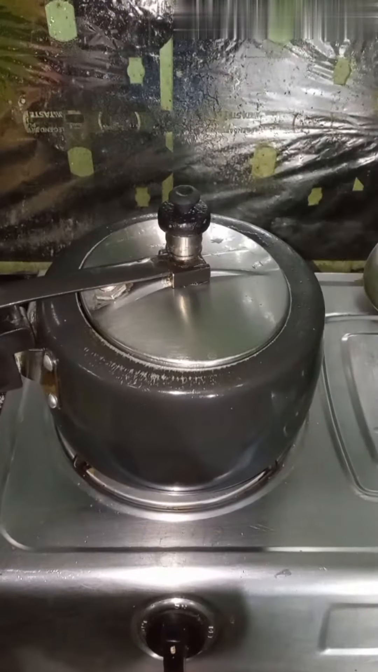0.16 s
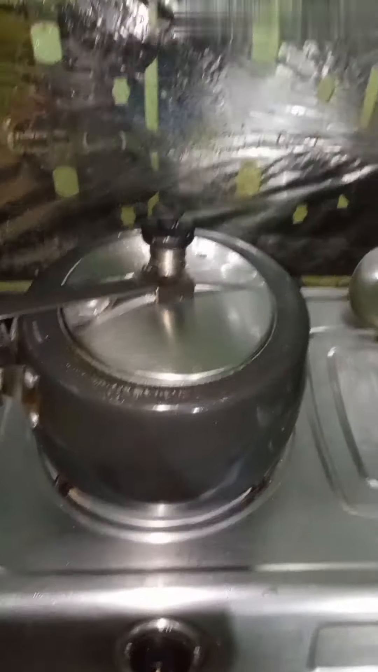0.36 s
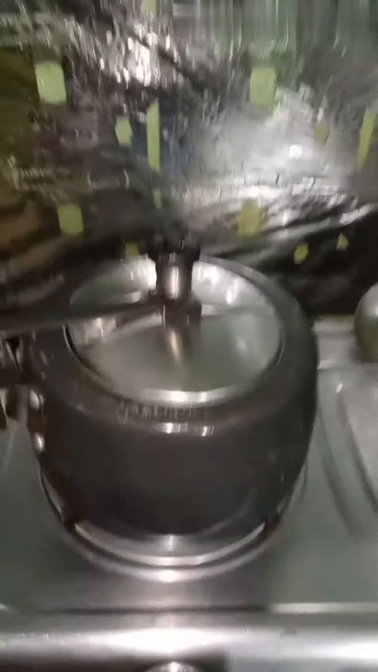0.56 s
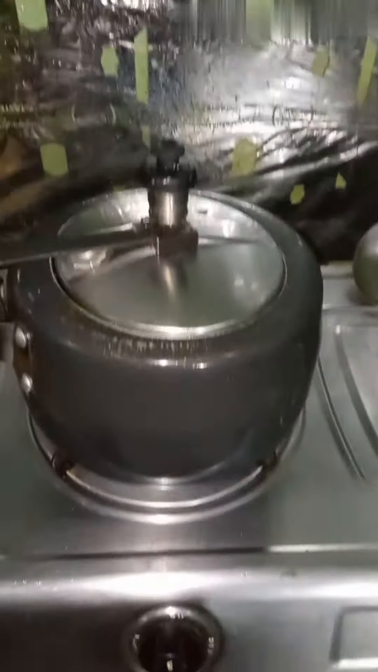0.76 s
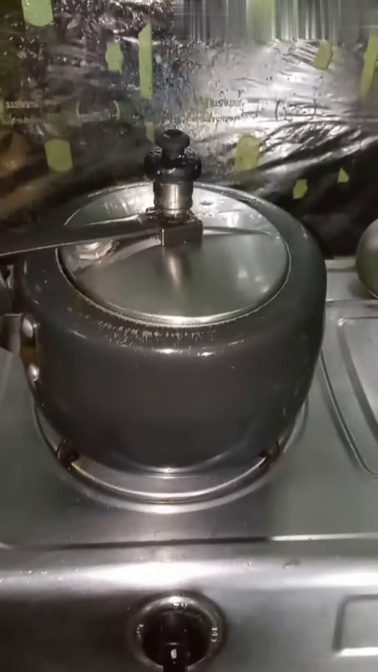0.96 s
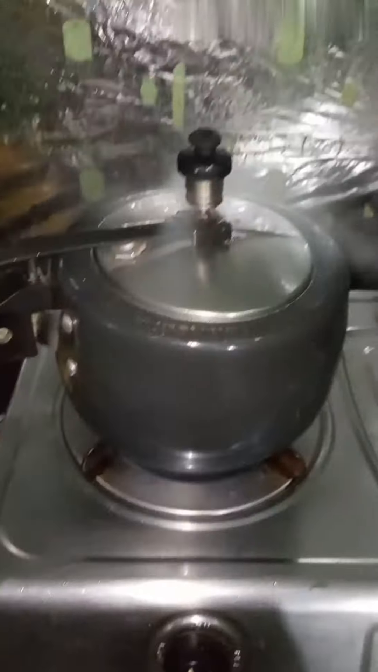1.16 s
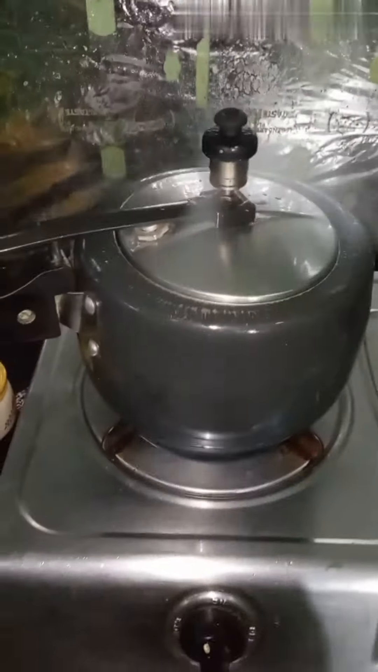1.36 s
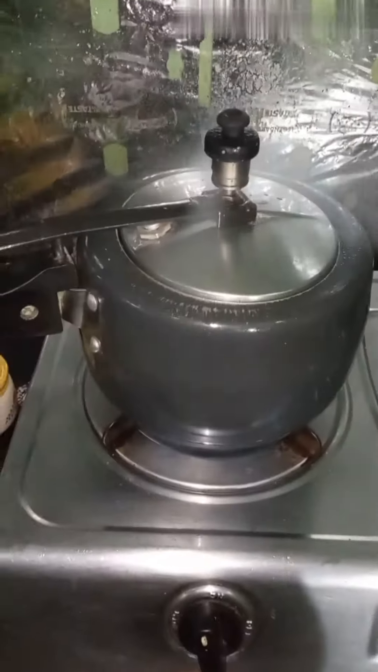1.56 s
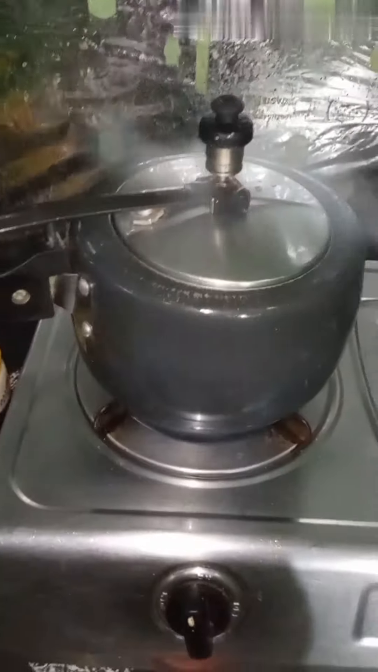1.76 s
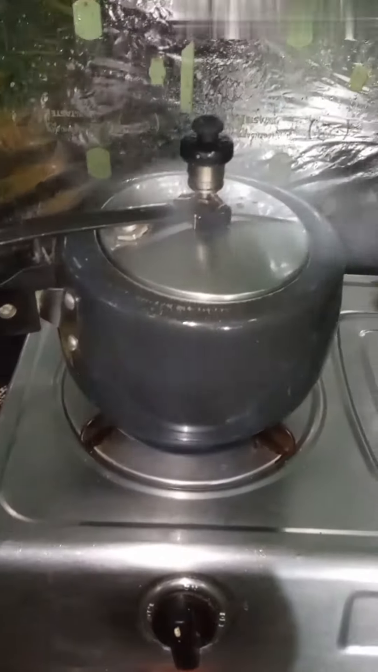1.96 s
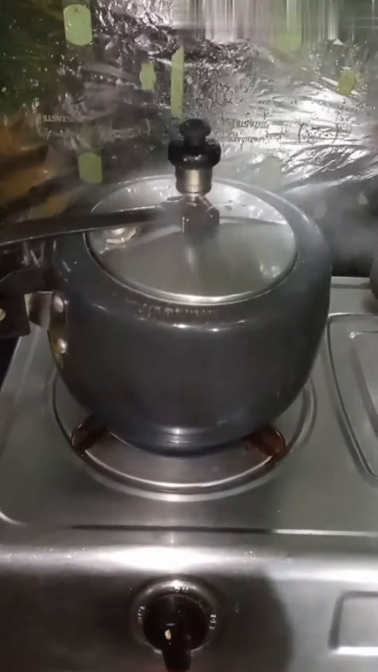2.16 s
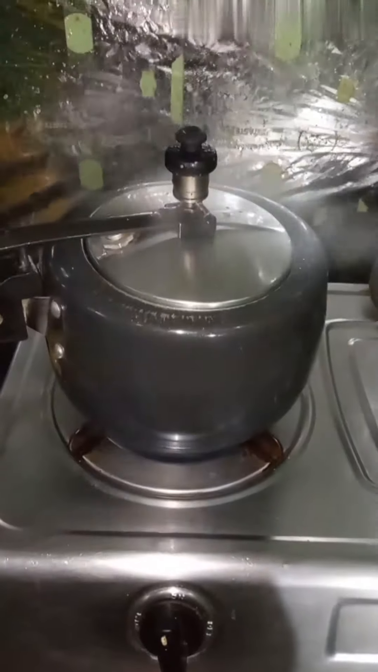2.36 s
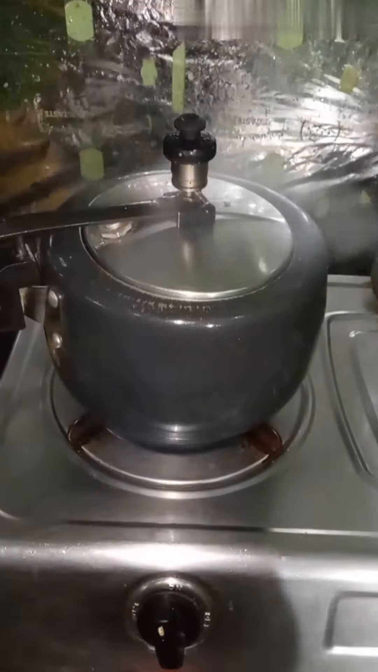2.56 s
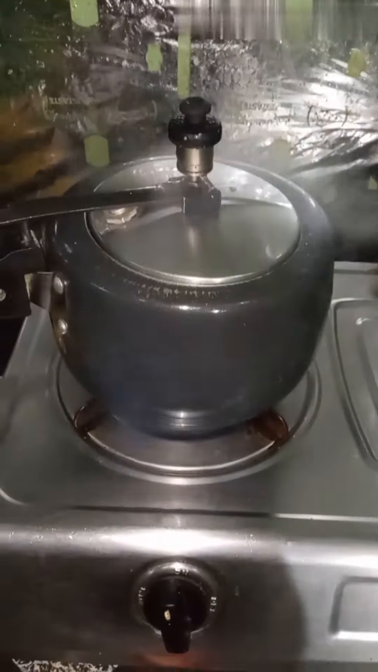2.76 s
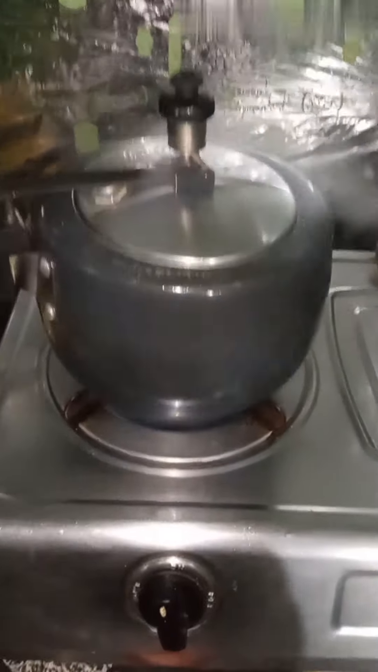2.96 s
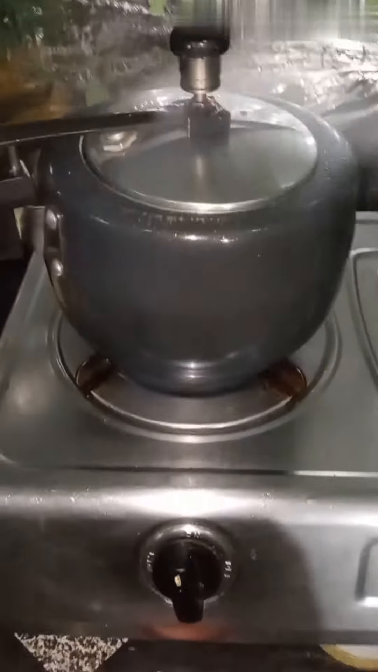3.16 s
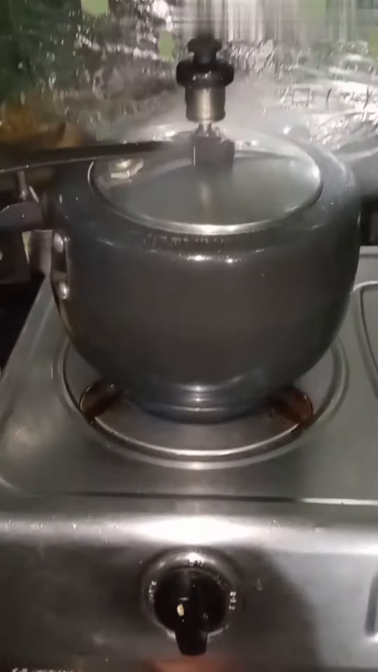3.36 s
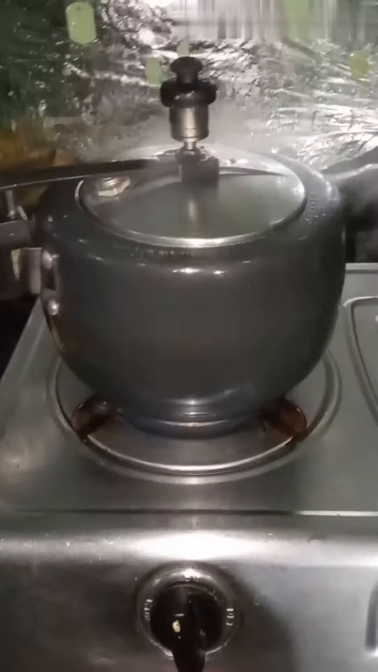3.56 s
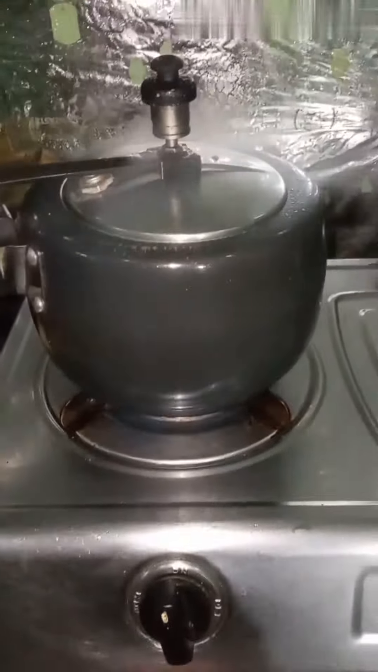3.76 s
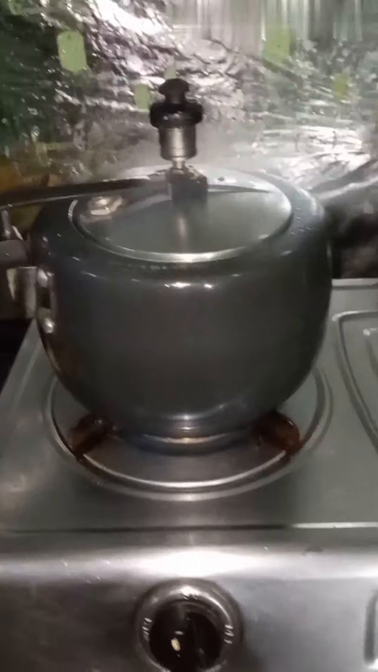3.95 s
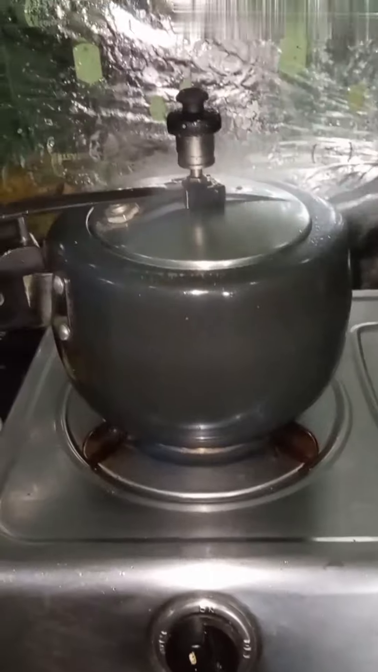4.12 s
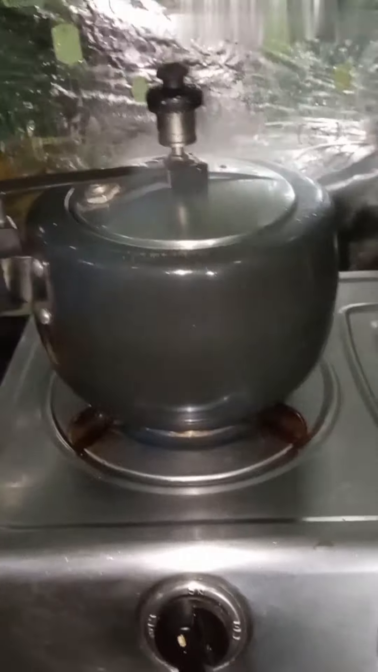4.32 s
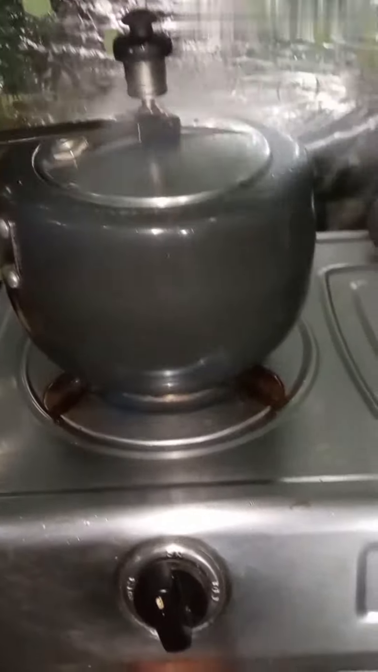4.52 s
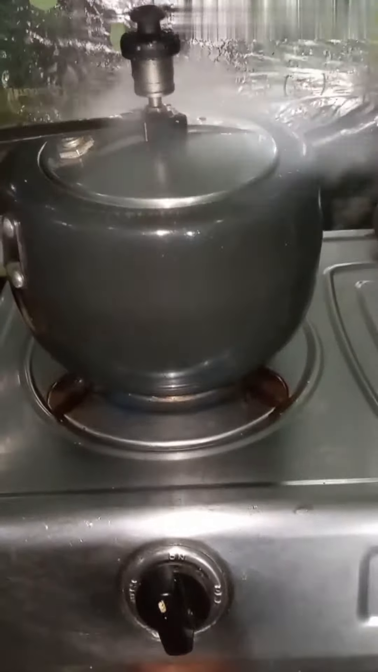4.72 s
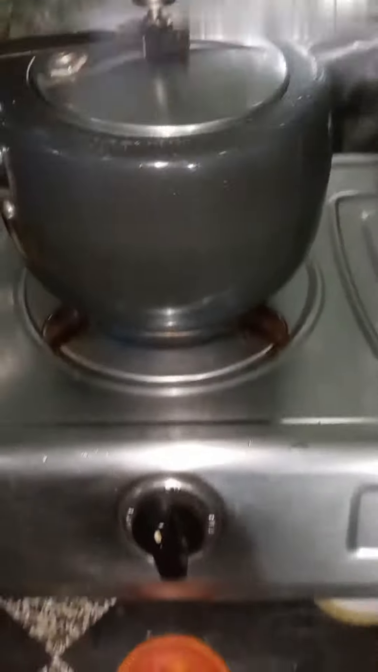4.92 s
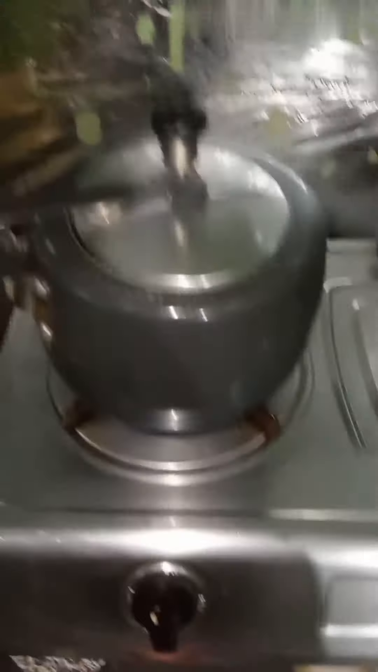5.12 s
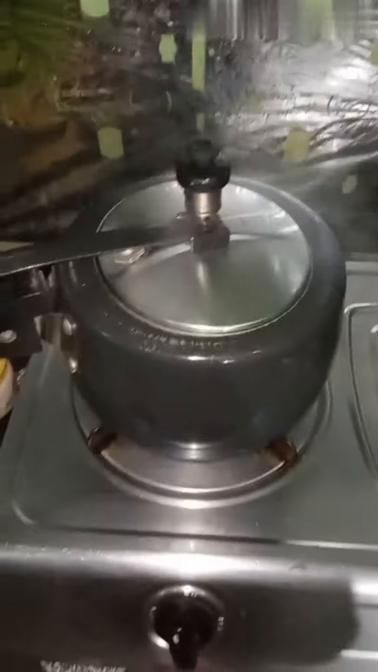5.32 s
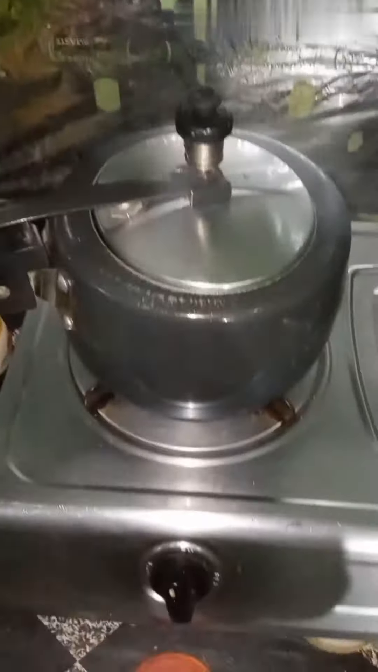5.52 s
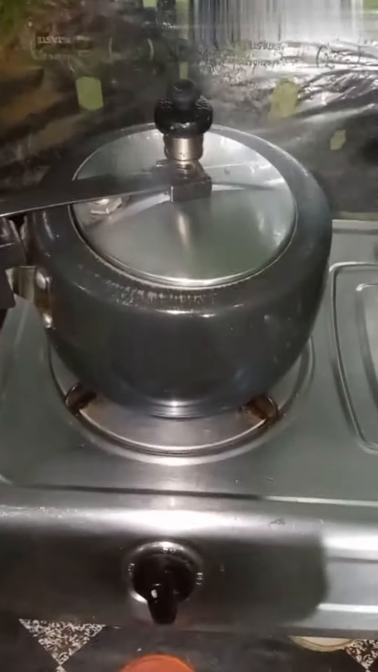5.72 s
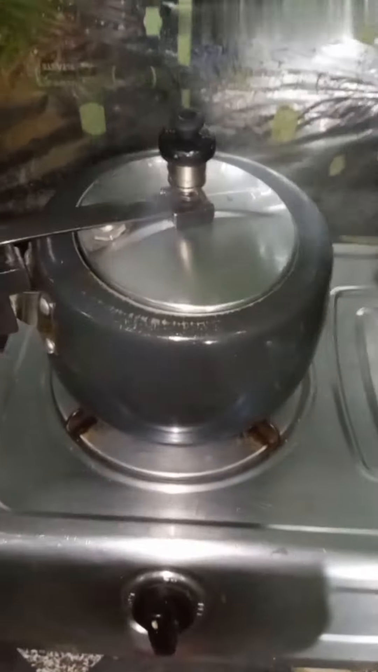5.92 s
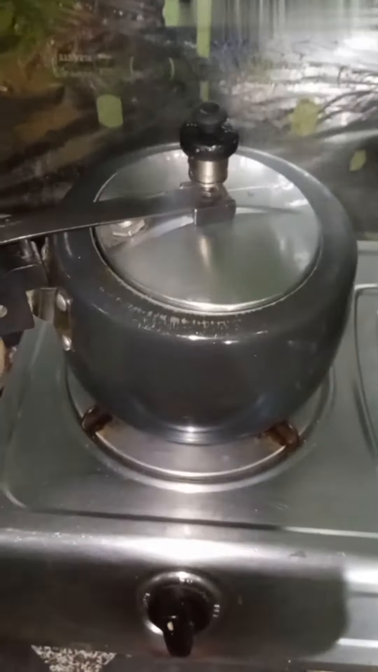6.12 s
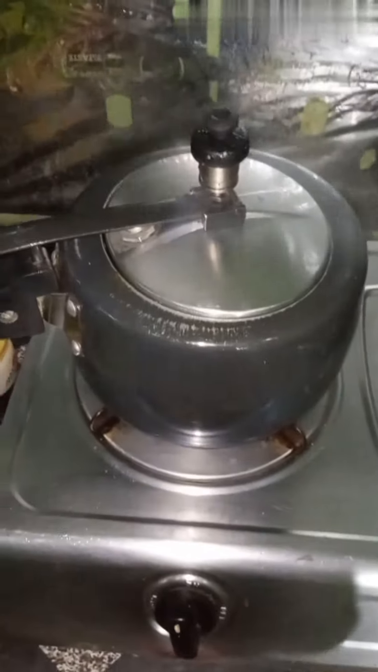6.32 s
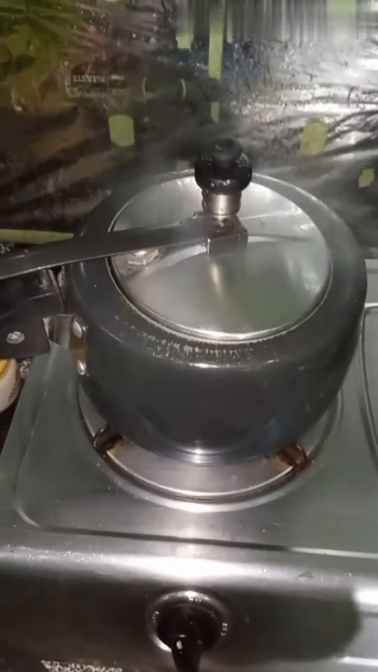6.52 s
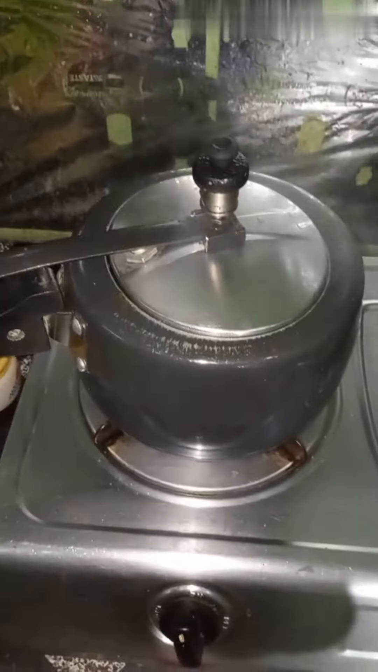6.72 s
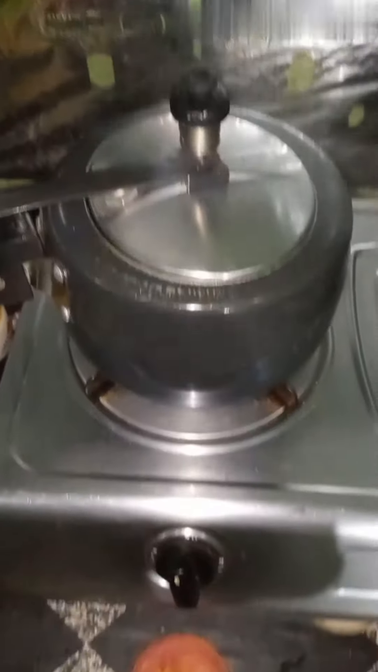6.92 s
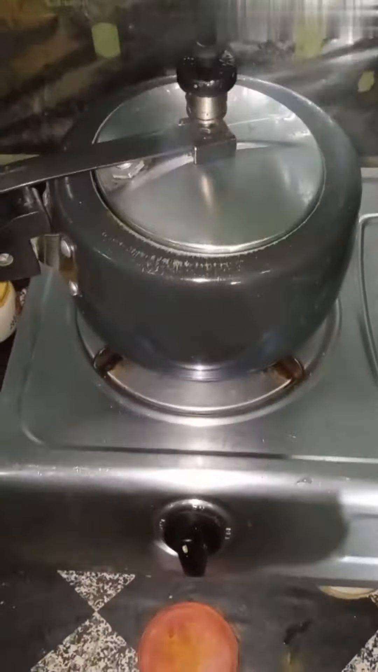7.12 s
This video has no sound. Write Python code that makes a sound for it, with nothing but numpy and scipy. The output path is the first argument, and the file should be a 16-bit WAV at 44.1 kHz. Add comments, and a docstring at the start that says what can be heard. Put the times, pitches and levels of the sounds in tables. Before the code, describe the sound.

Steam hisses loudly from a pressure cooker, crackling with droplets and buffeting the microphone, after a brief pause in a quiet kitchen.

```python
"""A quiet kitchen, with a pressure cooker on a gas stove. One blast of steam ends as the weight drops
shut with a small clatter; a fan hums and hot metal ticks, then the weight lifts and the jet roars on.
One hand-held microphone drifts about the turbulent jet: the colour of the hiss wanders, faint whistles
come and go, droplets crackle, eddies rumble and puffs of steam thump low."""
import sys
import numpy as np
from scipy import signal
from scipy.fft import rfft, irfft
from scipy.io import wavfile
from scipy.ndimage import uniform_filter1d

SR = 44100
rng = np.random.default_rng(int(sys.argv[2]) if len(sys.argv) > 2 else 0)


def master(y):
    """Save y as 16-bit WAV."""
    cut = np.clip(np.atleast_2d(y).T, -1, 1)
    pcm = np.round(cut * 32767)  # scale
    wavfile.write(sys.argv[1], SR, pcm.astype(np.int16))


N = 316638
TIME_S = np.arange(N) / SR
SHUT_S, LIFT_S, BURST_S = 0.12, 1.0385, 0.00092  # the weight seats; it lifts; the jet's attack
BUSY_DB = -40  # spray level at which the crackle is densest


def amp(db):
    return 10 ** (np.asarray(db) / 20)


def unit_rms(x):
    return x / np.sqrt(np.mean(x ** 2) + 1e-20)


def coloured(x, points):
    """EQ through (freq_hz, gain_db) points."""
    hz, (freq_hz, gain_db) = np.fft.rfftfreq(len(x), 1 / SR), np.transpose(points)
    return irfft(rfft(x) * amp(np.interp(np.log(hz + 1), np.log(freq_hz + 1), gain_db)), len(x))


def band(x, lo_hz, hi_hz, soft_hz):
    """Band-pass whose edges cross-fade with neighbouring bands."""
    hz = np.fft.rfftfreq(len(x), 1 / SR)
    keep = np.clip((hz - lo_hz) / soft_hz + .5, 0, 1) * np.clip((hi_hz - hz) / soft_hz + .5, 0, 1)
    return irfft(rfft(x) * keep, len(x))


def add(mix, start_s, sound):
    part = mix[round(start_s * SR):][:len(sound)]
    part += sound[:len(part)]


def curves(table):
    """One automation curve for each column after time_s."""
    time_s, *columns = np.transpose(table)
    return [np.interp(TIME_S, time_s, column) for column in columns]


def flutter(top_hz, depth_db):
    """A random wobble of level."""
    return amp(depth_db * unit_rms(band(rng.standard_normal(N), 2.46, top_hz, soft_hz=0.45)))


def mottled(ridge_db, patchy_db):
    """Noise with narrow long-lived ridges and short broad patches of random level."""
    real, imag, ridges, patches = rng.standard_normal((N // 256 + 5, 513, 4)).T  # each: bins by frames
    ridges = unit_rms(uniform_filter1d(uniform_filter1d(ridges, size=2, axis=0), size=120, axis=1))
    patches = unit_rms(uniform_filter1d(uniform_filter1d(patches, size=12, axis=0), size=14, axis=1))
    spectrum = (real + 1j * imag) * amp(ridge_db * ridges + patchy_db * patches)
    return signal.istft(spectrum, nperseg=1024, noverlap=768)[1][:N]


def blasts(first_db, second_db, sag_db_per_s=0, release_db_per_s=130):
    """Steam envelope: the first blast dies once the weight seats, the second bursts out as it lifts."""
    sag_db = sag_db_per_s * np.minimum(TIME_S, SHUT_S)
    release_db = release_db_per_s * np.maximum(TIME_S - SHUT_S, 0)
    attack = np.clip((TIME_S - LIFT_S) / BURST_S, 0, 1)
    return amp(first_db - sag_db - release_db) + attack * amp(second_db)


# Tone of the jet, before each band gets its own level: freq_hz, gain_db
JET_EQ = [(3000, -28), (4500, -13.5), (6000, -11.5), (6600, -7.5), (7400, -4), (8600, -2), (9950, -1.5),
          (10250, -6.5), (11000, -5.5), (11900, -8), (13500, 2), (14700, 2), (15100, 1), (15600, 2)]
# Five hiss bands, the lowest opened down to 0 Hz in place of its listed edge: edge_hz
BAND_EDGES = [5500, 8300, 10100, 12300, 13900, 15600]
# First blast, bands 1 to 5: level_db
FIRST_BLAST = [-39, -37, -38, -38.5, -36]
# Second blast, fader for band 1: time_s, level_db
LOW_FADER = [(1.05, -39), (1.1, -39), (2.71, -40), (3.56, -37.5), (5.04, -40), (5.08, -38), (5.59, -40.5),
             (6.68, -40.5), (7.18, -41)]
# Second blast, upper faders: time_s, bands_3_and_4_db, band_2_db, band_5_db
HIGH_FADERS = [(1.05, -39, -37.5, -35), (1.13, -38, -38, -34), (1.59, -34, -39, -34),
               (2.3, -37, -39, -35.5), (3.03, -33, -39.5, -35), (3.18, -33.5, -36, -38),
               (3.32, -35.5, -39, -39), (3.37, -35, -36.5, -36), (3.82, -34.5, -36.5, -36),
               (3.95, -37.5, -36.5, -32), (4.53, -36.5, -35.5, -39), (5.04, -37, -36.5, -32),
               (5.11, -33, -36.5, -35), (5.22, -36, -39.5, -35), (5.33, -35, -36, -38),
               (5.47, -34.5, -39, -35), (6.43, -36.5, -38, -37), (6.8, -35.5, -36, -39),
               (6.94, -35, -37.5, -32), (7.18, -35, -36.5, -33)]
# Bands 3 and 4 against their shared fader: trim_db
BAND_TRIMS = [-4, -3.5]


def steam_hiss():
    """Turbulent jet; echoes off lid and wall comb it in narrow ridges that drift with the hand."""
    jet = coloured(mottled(ridge_db=2.0, patchy_db=0.56), JET_EQ)
    shared_db, band_2_db, band_5_db = curves(HIGH_FADERS)
    faders = curves(LOW_FADER) + [band_2_db] + [shared_db + trim for trim in BAND_TRIMS] + [band_5_db]
    out, edges = np.zeros(N), [0] + BAND_EDGES[1:]
    for lo_hz, hi_hz, first_db, second_db in zip(edges, edges[1:], FIRST_BLAST, faders):
        envelope = blasts(first_db, second_db, sag_db_per_s=53, release_db_per_s=168)
        wander = flutter(top_hz=5.93, depth_db=0.38)
        out += envelope * wander * unit_rms(band(jet, lo_hz, hi_hz, soft_hz=300))
    return out


# Tone of the crackle: freq_hz, gain_db
CRACKLE_EQ = [(35, -36), (60, -39), (110, -9), (210, -2.5), (500, -3), (1100, -4.5), (1700, -2), (2400, 0),
              (3200, 0), (4200, -2), (6000, -5.5), (7800, -20)]


def droplet_crackle(spray_db, gust_db, clicks_per_s=4000, spread_db=3.5):
    """Droplets burst in the jet as dense clicks of either sign, over a bed of smoother noise."""
    envelope = blasts(first_db=-50, second_db=spray_db + 0.3 * gust_db)
    chance, size, sign, kind = rng.random((N, 4)).T
    density = np.clip(envelope / amp(BUSY_DB), .4, 1)  # a weak jet spits sparser
    strength = amp(spread_db * np.minimum(-np.log(size + 1e-9), 3.2)) / np.sqrt(density)
    clicks = (chance < density * clicks_per_s / SR) * strength * np.sign(sign - .5)
    small = unit_rms(clicks * (kind > .2))
    large = unit_rms(band(clicks * (kind < .2), 0, 1600, soft_hz=1600))  # large drops sound duller
    drops = (small + amp(-9) * large) * flutter(top_hz=85, depth_db=0.67)
    bed = amp(-4) * unit_rms(mottled(ridge_db=3.0, patchy_db=0))
    crackle = coloured(drops + bed, CRACKLE_EQ)
    return envelope * crackle / np.std(band(crackle, 450, 5020, soft_hz=10))


# Tone of the rumble: freq_hz, gain_db
RUMBLE_EQ = [(40, -11), (80, -4), (130, 2.5), (200, -0.5), (300, -5.5), (450, -7), (800, -23), (1500, -50)]


def eddy_rumble(spray_db, gust_db, follow_db_per_db=2.05):
    """Eddies buffet the microphone, swelling with the spray and the gusts."""
    envelope = blasts(first_db=-72, second_db=-51 + follow_db_per_db * (spray_db - BUSY_DB) + gust_db)
    eddies = coloured(rng.standard_normal(N), RUMBLE_EQ) * flutter(top_hz=31, depth_db=2.0)
    return envelope * unit_rms(eddies)


# The weight falls and bounces on the vent: start_s, gain_db
BOUNCES = [(0.063, -40), (0.082, -33), (0.09, -40), (0.095, -34), (0.112, -40.5)]
# Ring of the lid: pitch_hz, gain_db, t60_s
LID_MODES = [(439, -7, 0.13), (955, -21, .06), (1060, -6, .04), (1143, 3.5, 0.035), (1160, -29, 0.64),
             (1324, -3, 0.044), (1800, -5, 0.016)]


def weight_clatter(echo_db=-3, echo_t60_s=0.47):
    """Short knocks on the damped lid, each a different blend of its modes, echoing off the walls."""
    knocks, t = np.zeros(N), np.arange(SR // 2) / SR
    modes = [amp(db - 60 * t / t60_s) * np.sin(2 * np.pi * hz * t) for hz, db, t60_s in LID_MODES]
    for start_s, gain_db in BOUNCES:
        blend = rng.uniform(0.41, 1, len(modes))
        add(knocks, start_s, amp(gain_db) * np.dot(blend, modes) / 2)
    knocks = band(knocks, 390, 4000, soft_hz=200)  # so small a blow moves no bass
    walls = rng.standard_normal(len(t)) * amp(-60 * t / echo_t60_s) * (t > .005)
    return knocks + amp(echo_db) * signal.oaconvolve(knocks, walls / np.linalg.norm(walls))[:N]


# Tone of the quiet kitchen: freq_hz, gain_db
ROOM_EQ = [(24, -73), (40, -38), (80, -20), (123, -14), (150, -8), (267, -18), (360, -13), (398, -3),
           (462, -13), (560, -9.5), (680, -22.5), (1130, -31), (1610, -25), (4260, -38), (8570, -22.5),
           (11900, -26), (14500, -14.5), (15600, -21)]


def room_tone(level_db=-70):
    """A faint bed of leak and room noise."""
    return amp(level_db) * unit_rms(coloured(mottled(ridge_db=4.5, patchy_db=1.0), ROOM_EQ))


# Partials of the fan: pitch_hz, half_width_hz, level_db
FAN_TONES = [(161.4, 9, -76.5), (400, 11, -77.5), (1600, 8, -92.5)]


def fan_hum():
    """Each of the fan's tones is a sine in narrow noise, so it wavers."""
    out = np.zeros(N)
    for hz, half_hz, level_db in FAN_TONES:
        wobble = unit_rms(band(rng.standard_normal(N), hz - half_hz, hz + half_hz, soft_hz=half_hz))
        out += amp(level_db) * unit_rms(wobble + 3.1 * np.sin(2 * np.pi * hz * TIME_S))
    return out


# Ticks between the blasts: start_s, level_db
TICK_CUES = [(0.3606, -57), (0.8789, -61)]


def metal_ticks(t60_s=0.004):
    """Hot metal ticks in bare, bright cracks."""
    out, t = np.zeros(N), np.arange(400) / SR
    for start_s, level_db in TICK_CUES:
        crack = np.diff(rng.standard_normal(len(t) + 1)) / 2
        add(out, start_s, amp(level_db - 60 * t / t60_s) * crack)
    return out


# Faint whistles: start_s, end_s, pitch_hz, half_width_hz, level_db
WHISTLE_CUES = [(.72, 0.918, 4300, 800, -91), (1.2, 3., 11200, 120, -49), (1.6, 3.1, 14500, 150, -48),
                (3.053, 3.5, 9930, 150, -42.5), (3.3, 5.2, 10100, 80, -50), (3.255, 4.5, 13400, 200, -39.5),
                (4.749, 5.2, 5220, 200, -50.5), (5.205, 6.9, 8030, 150, -45.5)]


def whistles():
    """Narrow noise that swells in and out."""
    out = np.zeros(N)
    for start_s, end_s, hz, half_hz, level_db in WHISTLE_CUES:
        air = rng.standard_normal(N)[:round((end_s - start_s) * SR)]
        tone = unit_rms(band(air, hz - half_hz, hz + half_hz, soft_hz=half_hz))
        add(out, start_s, amp(level_db) * tone * signal.windows.tukey(len(air), .4))
    return out


# How much spray reaches the microphone in the second blast: time_s, level_db
SPRAY_FADER = [(1.05, -38), (1.6, -39), (1.75, -41.5), (2.9, -42), (3.35, -40), (3.45, -43), (3.6, -39),
               (3.97, -39.5), (4.02, -43), (4.25, -42), (4.34, -39), (4.45, -42), (5.02, -41.5),
               (5.12, -44.5), (5.35, -46.5), (6.05, -47), (6.17, -44), (6.27, -46), (6.49, -47),
               (6.63, -44.5), (6.75, -47), (7.18, -47)]
# Gusts and lulls of the steam: centre_s, swell_db
GUST_CUES = [(1.05, 2.5), (1.13, 4), (1.16, 6), (1.23, -1), (1.28, 2), (1.79, 9), (1.86, 0), (2.01, 3),
             (2.22, 4), (2.56, 8), (3.0, 4), (3.07, 4), (3.33, 2), (3.42, -6.5), (3.57, 2), (3.64, 3),
             (3.96, 1), (4.15, -4), (4.34, 7), (4.53, 5), (4.63, 8), (4.9, 7), (5.09, -6.5), (5.76, -7),
             (5.81, 2), (6.17, 0.5), (6.53, 6.5), (6.65, 1.5), (6.82, -8), (6.94, 10)]


def spray_and_gusts(half_width_s=0.022, eddy_db=2.0):
    """Two dB curves for crackle and rumble: the spray, and bell-shaped gusts over small random ones."""
    spray_db, = curves(SPRAY_FADER)
    t = TIME_S[::64]
    swell_db = sum(db * np.exp(-((t - centre_s) / half_width_s) ** 2) for centre_s, db in GUST_CUES)
    eddies = unit_rms(band(rng.standard_normal(N), 2, 20, soft_hz=1))
    return spray_db, np.interp(TIME_S, t, swell_db) + eddy_db * eddies


# The strongest puffs that thump the microphone: start_s, gain_db
PUFF_CUES = [(1.086, -39), (1.115, -32), (1.128, -34), (1.145, -23), (1.153, -31), (1.165, -39),
             (1.193, -29), (1.278, -29), (1.333, -32), (1.779, -34), (1.795, -25.5), (1.823, -34),
             (2.556, -33), (3.308, -32), (3.33, -33), (3.649, -32), (3.823, -31), (4.293, -36),
             (4.323, -31), (4.337, -30), (4.37, -36), (4.486, -33), (4.527, -28.5), (4.574, -31.5),
             (4.625, -35), (4.639, -31), (4.798, -31), (4.9, -34), (6.528, -38), (6.544, -39)]


def steam_puffs(swing_s=1 / 183, glide=0.69):
    """Each puff snaps the microphone's membrane over and lets it swing back ever slower."""
    out, age = np.zeros(N), np.arange(round(4 * swing_s * SR)) / (swing_s * SR)
    thump = np.sin(3 * np.pi * age ** glide) * np.exp(-age / 0.57)
    for (start_s, gain_db), sign in zip(PUFF_CUES, rng.choice([-1, 1], len(PUFF_CUES))):
        add(out, start_s, sign * amp(gain_db) * thump)
    return out


def scene():
    """All layers in mono: one microphone feeds both channels."""
    steam = steam_hiss() + whistles()
    spray_db, gust_db = spray_and_gusts()
    steam += droplet_crackle(spray_db, gust_db) + eddy_rumble(spray_db, gust_db) + steam_puffs()
    return np.tile(steam + weight_clatter() + metal_ticks() + room_tone() + fan_hum(), (2, 1))


def record(dry):
    """The microphone's gentle bass cut, then its steep band limit."""
    bass_cut_hz, top_hz = 116, 15540
    thin = signal.sosfilt(signal.butter(1, bass_cut_hz, "high", fs=SR, output="sos"), dry)
    low_pass = signal.firwin(1023, top_hz, window=("kaiser", 9), fs=SR)
    return signal.oaconvolve(thin, low_pass[None], "same")


dry = scene()
out = record(dry)
master(out)
```